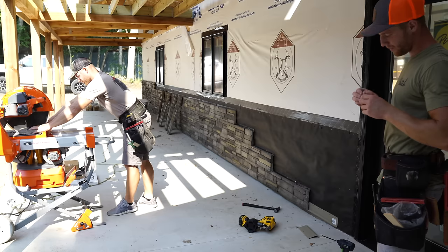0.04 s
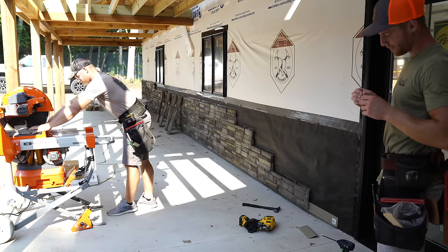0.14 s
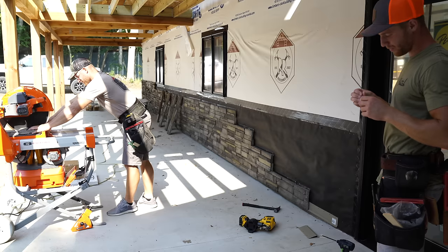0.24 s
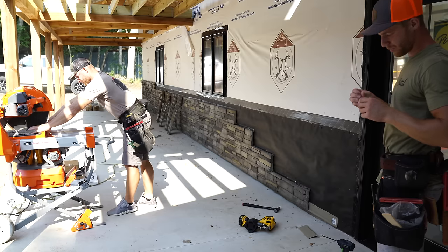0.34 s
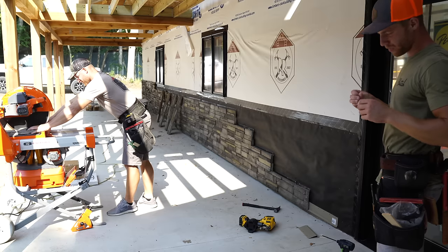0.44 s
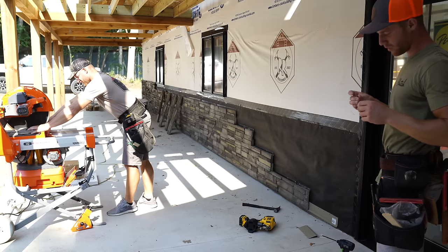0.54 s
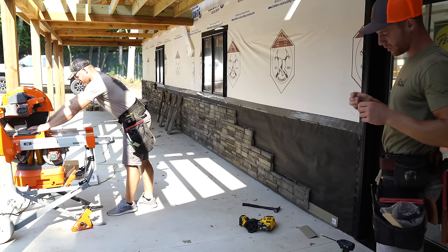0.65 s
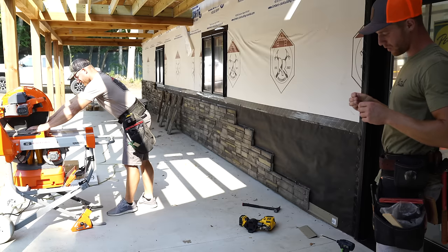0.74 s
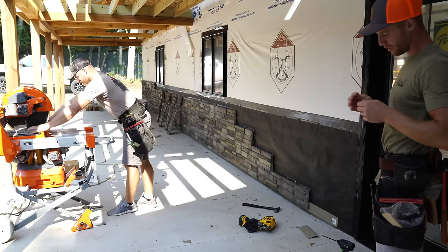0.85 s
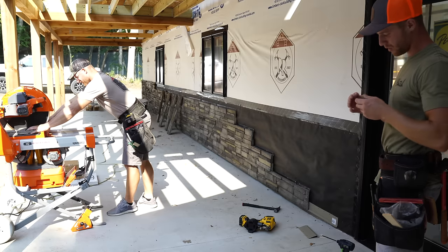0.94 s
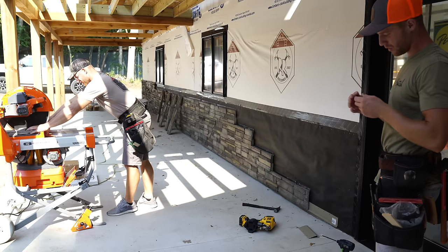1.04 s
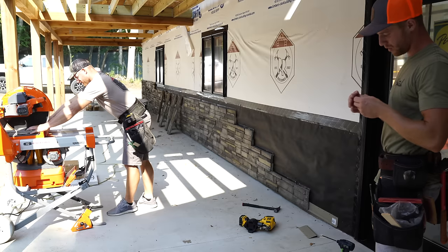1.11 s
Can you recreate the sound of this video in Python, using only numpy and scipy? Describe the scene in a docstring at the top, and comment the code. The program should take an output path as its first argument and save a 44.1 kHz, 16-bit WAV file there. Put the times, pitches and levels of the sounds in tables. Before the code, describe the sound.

On a covered porch, a stone-cutting saw rasps, sings with high blade whistles, speeds up, then is switched off and coasts lower.

```python
"""A geared masonry saw finishes a cut through stone on a covered porch.
The blade grinds in looped grit noise and rings in narrow modes; the motor gains speed as the load eases.
Gear tones locked to the shaft, gliding blade whistles, fan roar and rushing air lie over it.
The switch snaps off and the whine runs down, the blade swishing once a turn, over a low breeze."""
import sys
import numpy as np
from scipy import signal
from scipy.fft import rfft
from scipy.io import wavfile
from scipy.ndimage import map_coordinates

SR = 44100
rng = np.random.default_rng(int(sys.argv[2]) if len(sys.argv) > 2 else 0)


def digitize_waveform(pressure):
    """Quantize a signal to 16-bit integers and store it at the path in sys.argv[1].

    Rows of a 2-D input are taken as channels; values are limited to [-1, 1].
    """
    field = np.atleast_2d(pressure).T
    bounded = np.clip(field, -1, 1)
    quanta = np.round(bounded * 32767).astype(np.int16)
    wavfile.write(sys.argv[1], SR, quanta)


N = 251414
TIME = np.arange(N) / SR  # seconds
POWER_OFF_S = 4.375  # the motor loses power and the blade coasts


def gain_of(db):
    """Turns decibels into an amplitude factor."""
    return 10 ** (np.asarray(db) / 20)


def evened(x):
    """Brings a sound to unit RMS level."""
    return x / np.sqrt(np.mean(x ** 2) + 1e-20)


def curves(rows):
    """Each column of a timed table as a value per sample."""
    s, *columns = np.transpose(rows)
    return [np.interp(TIME, s, column) for column in columns]


def ramp(start_s, length_s):
    """Goes from 0 to 1 over a stretch of time."""
    return np.clip((TIME - start_s) / length_s, 0, 1)


def read(points, hz):
    """A spectrum joined by straight lines over log frequency."""
    f, value = np.transpose(points)
    return np.interp(np.log(hz + 1e-3), np.log(f), value)


def shaped(x, points):
    """Passes a sound through a fixed response in dB."""
    response = gain_of(read(points, np.fft.rfftfreq(N, 1 / SR)))
    return np.fft.irfft(rfft(x) * response, N)


def colour(x, points):
    """Filters a sound through a spectrum, then brings it to unit level."""
    return evened(shaped(x, points))


def noise():
    """White noise over the whole scene."""
    return rng.standard_normal(N)


def drift(width_hz):
    """Slow complex chance of unit power: the envelope of a noise-driven resonance."""
    count = N // 32 + 2  # one point per 32 samples is enough
    hz = np.fft.fftfreq(count, 32 / SR)
    chance = rng.standard_normal(count) + 1j * rng.standard_normal(count)
    z = np.fft.ifft(chance / (1 + (hz / width_hz) ** 2))
    return np.interp(np.arange(N), np.linspace(0, N, count), z / np.std(z))


def tone(turns, rough, width_hz):
    """A unit tone, partly steady and partly fluttering; turns is its phase in cycles."""
    share = np.clip(rough, 0, 1)
    envelope = np.sqrt(1 - share) + np.sqrt(share) * drift(width_hz)
    carrier = np.exp(2j * np.pi * (turns + rng.random()))
    return np.sqrt(2) * (envelope * carrier).real


def drive():
    """Blade speed, its octaves below full speed, and the load (0-1) that shows in the sag of the motor."""
    # under power the blade picks up speed as the cut eases: (time [s], speed [turns/s])
    powered_speed = [(0, 44.08), (.4, 44.4), (.72, 45.14), (1.08, 46.4), (1.44, 47.1), (2.5, 49.59),
                     (2.88, 50.72), (3.6, 51.88), (4.375, 52.84)]
    # air drag alone would halve the speed in drag_s; the bearings take a steady toll [turns/s each second]
    drag_s, friction = 1.43, 2.29
    driven = curves(powered_speed)[0]
    coast_s = np.maximum(TIME - POWER_OFF_S, 0)
    speed = driven / (1 + coast_s / drag_s) - friction * coast_s
    load = (driven.max() - driven) / (driven.max() - driven.min())
    return speed, np.log2(speed / driven.max()), load


def contact():
    """Levels in dB of the grinding and of the ringing; both die away once the stone has parted."""
    # stone against blade: (time [s], grinding [dB], ringing of the steel [dB])
    cut = [(0, -27.5, -36), (.22, -28, -42), (.35, -30.5, -49), (.52, -27, -44), (.8, -32, -51),
           (1.3, -30, -46), (1.62, -36.5, -41.5), (1.8, -42, -52), (3, -49, -64)]
    parted_db = 10 * np.maximum(TIME - cut[-1][0], 0)  # the last faint rubbing fades at 10 dB/s
    return [db - parted_db for db in curves(cut)]


def grinding(turns, throb):
    """Diamond grit meets the stone in much the same pattern every turn, and sets the disc ringing."""
    # spectrum of the scrape: (frequency [Hz], relative level per Hz [dB])
    grit = [(100, -49), (250, -10), (400, 5.5), (600, -4.5), (1500, 0), (3000, -6), (4300, -0.5),
            (6000, -8.5), (10000, -11), (15500, -16.5)]
    # modes of the steel disc, levels relative to the ringing:
    # (frequency [Hz], width [Hz], first ringing [dB], later ringing [dB])
    modes = [(3930, 30, -3, -5), (4310, 60, -2, -4), (4730, 80, -1, -5), (5960, 14, 1, -12),
             (7430, 30, 0, -7), (8340, 25, -10, -4), (9320, 45, -6, -7), (10480, 90, -5, -7),
             (11480, 50, -18, -10), (13050, 110, -9, -6), (14620, 60, -16, -4), (15480, 60, -11, -6)]
    # early in the cut the ringing shifts partway to other modes: (time [s], share of later ringing [0-1])
    shift_rows = [(.15, 0), (.5, 0.57)]
    grind_db, ring_db = contact()
    ring_shift = curves(shift_rows)[0]

    rim = rng.standard_normal(size=1000)
    pattern = np.interp(turns % 1, np.linspace(0, 1, len(rim)), rim)  # repeats each turn
    chips = noise() * gain_of(5.4 * drift(width_hz=600).real)  # never repeats
    scrape = colour(2.4 * evened(pattern) + 0.27 * evened(chips), grit)

    ring = np.zeros(N)
    for hz, width, first_db, later_db in modes:
        mode_db = first_db + ring_shift * (later_db - first_db)
        ring += gain_of(mode_db) * tone(hz * TIME, rough=.9, width_hz=width)
    return throb * (gain_of(grind_db) * scrape + gain_of(ring_db) * ring)


def standing(hz):
    """Near reflections swell or cancel a tone as its pitch slides."""
    # (delay [s], gain [linear])
    echoes = [(0.005954, 0.39), (0.010967, 0.32), (0.02253, 0.16), (0.036457, 0.23), (0.038116, 0.19)]
    return abs(1 + sum(gain * np.exp(-2j * np.pi * hz * delay) for delay, gain in echoes))


def gears(turns, speed, load):
    """The tooth-mesh whine, the coasting whine and their overtones all follow the shaft."""
    # mesh whine before wavering and reflections; it drops when the blade starts to sing
    # and fades as the motor coasts: (time [s], level [dB])
    mesh_rows = [(0, -25), (.18, -31), (.32, -35.5), (.85, -30), (1.23, -27), (1.32, -35.5), (3.4, -35.5),
                 (3.6, -31.5), (4.375, -34.5), (5.1, -39.5), (5.25, -47), (5.7, -46)]
    # a lower whine that stands out once the gears go slack: (time [s], level [dB])
    coast_rows = [(4.39, -47), (4.43, -26.5), (4.58, -31.5), (4.68, -24.5), (4.87, -38.5), (5.1, -38.5),
                  (5.32, -31), (5.53, -41.5), (5.7, -39)]
    # overtones ahead of the housing: (pitch [cycles/turn], under power [dB], coasting [dB])
    overtone_rows = [(80, -47, -52), (108, -51, -60), (113, -66, -47), (120, -62, -49), (135, -53, -60),
                     (239, -75, -59), (279, -75, -57), (319, -75, -57)]
    # how well the housing radiates those overtones: (frequency [Hz], response [dB])
    housing = [(1500, -8), (2600, 0), (4600, 0), (6000, -6), (7000, 0), (8400, 0), (9300, -12),
               (11000, -25)]
    teeth, coast_order = 45, 40  # cycles per blade turn
    coasting = ramp(POWER_OFF_S, 0.38)

    mesh_db = curves(mesh_rows)[0] + 2.5 * drift(width_hz=3).real  # wavers slowly
    mesh = gain_of(mesh_db) * standing(teeth * speed) * tone(teeth * turns, rough=.04, width_hz=40)

    octave_db = -48.5 + 4.5 * load + 2.5 * coasting  # running free, more under load, more coasting
    octave = tone(2 * teeth * turns, rough=0.43, width_hz=21)
    octave *= gain_of(octave_db) * standing(2 * teeth * speed)

    whine = gain_of(curves(coast_rows)[0]) * tone(coast_order * turns, rough=0.26, width_hz=37)

    overtones = np.zeros(N)
    for order, driven_db, free_db in overtone_rows:
        overtone_db = driven_db + coasting * (free_db - driven_db)
        overtones += gain_of(overtone_db) * tone(order * turns, rough=1.0, width_hz=45)
    return mesh + octave + whine + shaped(overtones, housing)


def whistle(throb, start, length, first_hz, last_hz, arch_hz, db, swell_db, rough, width_hz):
    """A resonance of the spinning blade that sings up, glides and fades."""
    attack_s, release_s = .05, .03
    along = ramp(start, length)
    hz = first_hz + (last_hz - first_hz) * along + arch_hz * np.sin(np.pi * along)
    release = np.exp(-np.maximum(TIME - start - length, 0) / release_s)
    envelope = ramp(start, attack_s) * release
    swish = throb ** (1.8 * rough)  # the rougher a whistle, the more it throbs with each turn
    level = gain_of(db + swell_db * along)
    return swish * envelope * level * tone(np.cumsum(hz) / SR, rough, width_hz)


def whistles(throb):
    """The spinning blade sings in several overlapping whistles."""
    # (start [s], length [s], first pitch [Hz], last pitch [Hz], arch [Hz],
    #  starting level [dB], swell [dB], roughness [0-1], width [Hz])
    whistle_rows = [(0, 1.0, 3222, 3240, 0, -36, 4, .55, 90), (.92, .42, 2684, 2696, 0, -39, 15.5, .1, 34),
                    (1.0, 1.22, 3283, 3355, -8, -28.5, 1, .45, 80),
                    (1.37, 1.47, 2701, 2756, 6, -21.8, -6, .07, 34),
                    (1.98, .15, 6590, 6590, 0, -45, 2, .17, 20),
                    (2.24, .78, 3385, 3395, 58, -28.8, 4, .4, 80),
                    (3.55, .85, 3355, 3290, 20, -34.5, 2.5, .7, 90),
                    (4.43, .19, 2765, 2712, 0, -26, -5, .15, 34)]
    return sum(whistle(throb, *row) for row in whistle_rows)


def hum(turns, octaves, load):
    """The drive drones harder under load; its mains-borne lines end when the switch opens."""
    # torque pulses mix with the shaft and beat:
    # (shaft part [cycles/turn], mains part [cycles/torque pulse], relative level [dB])
    lines = [(0, 1, -53), (3, 0, -53), (3, 1, -48), (6, 0, -50), (9, -1, -54), (8, 0, -42), (3, 2, -40),
             (6, 1, -42), (9, 0, -35), (12, 0, -50), (19, 0, -45), (20, 0, -49)]
    # stand and water tray favour the hum near their resonances: (frequency [Hz], response [dB])
    frame = [(100, -1), (145, -1), (200, -7), (250, 2), (300, 0), (355, 0), (398, 2), (422, -2), (450, -11),
             (530, -3), (700, -5), (850, 2), (900, -2), (960, -10)]
    pulse_hz = 120  # torque pulses, at twice the mains rate
    powered = 1 - ramp(POWER_OFF_S, 0.056)
    drone = np.zeros(N)
    for order, pulses, db in lines:
        line = tone(order * turns + pulses * pulse_hz * TIME, rough=.1, width_hz=8)
        drone += gain_of(db) * line * (powered if pulses else 1)
    # running free, more under load, less when coasting, rising 10.5 dB per octave of speed
    level_db = -8 + 9.5 * load ** 2.2 - 9 * (1 - powered) + 10.5 * octaves
    return shaped(gain_of(level_db) * drone, frame)


def fan(turns, octaves):
    """Roar of the cooling fan: turbulence laid out along the shaft angle, so that it slides with speed."""
    # (pitch [cycles/turn], relative level [dB])
    fan_shape = [(30, -28), (47, -12), (53, 0.5), (59, 0), (64, 0), (68, -4), (73, -13), (95, -17),
                 (160, -29)]
    per_turn = N / (turns[-1] + 1)  # noise points in one turn
    orders = np.fft.rfftfreq(N, 1 / per_turn)
    band = gain_of(read(fan_shape, orders)) / (1 + (orders / 200) ** 8)
    eddies = np.fft.irfft(rfft(noise()) * band, N)
    roar = evened(map_coordinates(eddies, [turns * per_turn], order=3))
    # 2 dB weaker while the blade is buried; opens up over a second as it clears the stone
    buried_db = -2 * (1 - ramp(2.5, 1.0))
    return gain_of(-24 + 14 * octaves + buried_db) * roar


def air(speed, octaves, throb):
    """Rush through the housing and hiss off the rim, whose faint flickering top fades with speed."""
    # spectrum of each: (frequency [Hz], relative level per Hz [dB])
    rush_shape = [(60, -24), (150, -10.5), (220, -14), (300, -5), (385, -0.5), (520, -5.5), (700, -3.5),
                  (850, 0), (1050, -5), (1220, 1), (1450, 0), (2000, 0), (3000, -14), (4500, -31)]
    hiss_shape = [(1500, -18), (2800, -0.5), (3800, 2.5), (4600, -5.5), (5600, -8), (7000, -12),
                  (8500, -13), (10500, -17.5), (13500, -25), (15700, -41)]
    top_shape = [(4000, -12), (7000, -3), (9500, 0), (12500, 3), (15700, -18)]  # top of the hiss
    grind_db = contact()[0]
    # level at full speed, rising 9.5 dB per octave of speed; the stone adds its own rush and hiss
    rush_gain = np.hypot(gain_of(-29 + 9.5 * octaves), gain_of(grind_db - 8.5))
    hiss_gain = np.hypot(gain_of(-31.5 + 9.5 * octaves), gain_of(grind_db - 3.5))
    rush = rush_gain * colour(noise(), rush_shape)
    hiss = hiss_gain * colour(noise() * gain_of(1.8 * drift(width_hz=140).real), hiss_shape)
    # the top flickers irregularly, fast and slow at once
    flicker = gain_of(3.9 * drift(width_hz=500).real + 5.1 * drift(width_hz=29).real)
    top = gain_of(-49.5) * (speed / speed.max()) ** 4 * colour(noise() * flicker, top_shape)
    return rush + throb * (hiss + top)


def free_ring():
    """Moving air keeps a few resonances of the disc and its guard sounding."""
    # (frequency [Hz], width [Hz], level [dB])
    resonances = [(152, 25, -60), (426.5, 37, -51), (1208, 22, -45), (3470, 62, -50), (6900, 80, -61),
                  (8100, 160, -58.5)]
    return sum(gain_of(db) * tone(hz * TIME, rough=0.64, width_hz=width) for hz, width, db in resonances)


def switch():
    """The switch lets go: bright noise snaps and low decaying thuds in the housing."""
    # (time [s], snap [dB], thud [dB])
    clicks = [(4.401, -28, -28.5), (4.441, -38, -52)]
    snap_shape = [(500, -4), (2000, -2), (4000, 0), (8500, -4.5), (11000, -13), (15500, -16)]  # (Hz, dB)
    out = np.zeros(N)
    for s, snap_db, thud_db in clicks:
        age = np.maximum(TIME - s, 0)
        snap = colour(noise(), snap_shape)
        out += (1 - np.exp(-age / 0.0018)) * gain_of(snap_db - 60 * age / 0.3) * snap
        thud = np.sqrt(2) * np.sin(2 * np.pi * 312 * age) * gain_of(-60 * age / .2)
        out += (1 - np.exp(-age / 0.0031)) * gain_of(thud_db) * thud
    return out


def porch(x):
    """Sparse echoes off wall, slab and rafters, each band dying at its own speed."""
    # (frequency [Hz], time to fall 60 dB [s])
    decay = [(100, 0.45), (500, 0.51), (3000, 0.46), (8000, 0.52), (16000, 0.15)]
    length = SR // 2
    taps = rng.choice([-1., 1.], length) * (rng.random(length) < 2000 / SR)  # about 2000 echoes a second
    hz, t, z = signal.stft(taps, SR, nperseg=256)
    fading = gain_of(-60 * t / read(decay, hz)[:, None])
    tail = signal.istft(z * fading, SR, nperseg=256)[1]
    return signal.fftconvolve(x, tail / np.linalg.norm(tail))[:N]


def breeze():
    """Lumpy low rumble of the open air; it freshens slowly, with one gust."""
    shape = [(12, -18.0), (25, -19), (40, 1.5), (70, -7), (200, -21), (1000, -80)]  # (Hz, dB)
    gust = np.exp(-((TIME - 4.87) / .22) ** 2)
    lumps = drift(width_hz=4).real
    level_db = -67.5 + 2.2 * TIME + 4 * gust + 2 * lumps
    return gain_of(level_db) * colour(noise(), shape)


def scene():
    """The saw, heard from a few steps down the porch."""
    speed, octaves, load = drive()
    turns = np.cumsum(speed) / SR
    # the disc runs slightly out of true: a swish once a turn
    throb = gain_of(1.12 * np.cos(2 * np.pi * turns))
    saw = grinding(turns, throb) + gears(turns, speed, load) + whistles(throb) + hum(turns, octaves, load)
    saw += fan(turns, octaves) + air(speed, octaves, throb) + throb * free_ring() + switch()
    heard = saw + gain_of(-15) * porch(saw) + breeze()
    return np.array([heard, heard])


def record(dry):
    """One microphone on both channels, with a steep low-pass at 15720 Hz."""
    lowpass = signal.firwin(511, 15720, window=("kaiser", 9), fs=SR)
    return signal.oaconvolve(dry, lowpass[None], "same", axes=1)


dry = scene()
out = record(dry)
digitize_waveform(out)
```